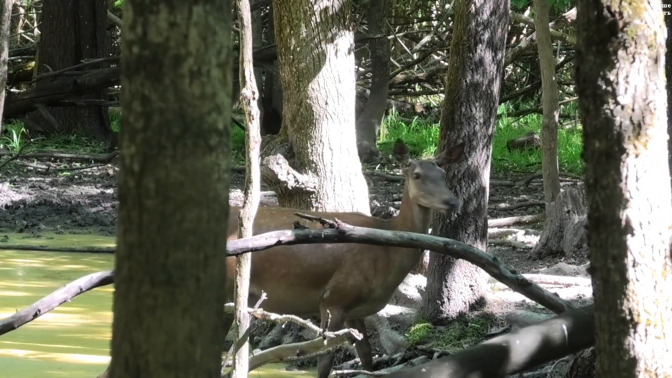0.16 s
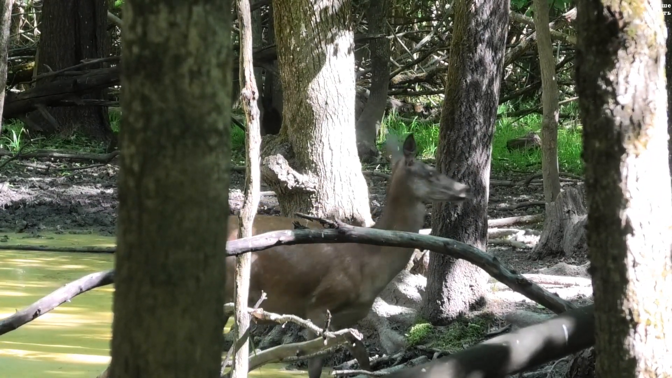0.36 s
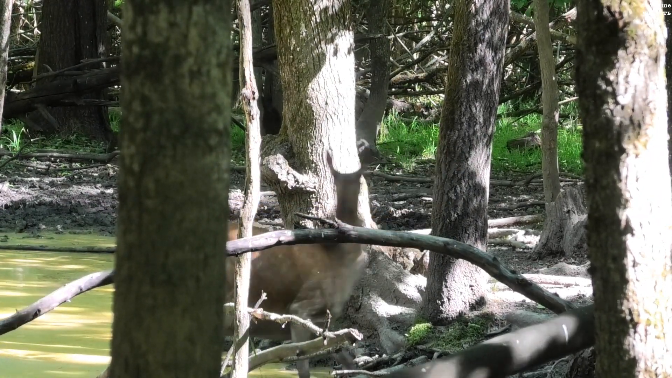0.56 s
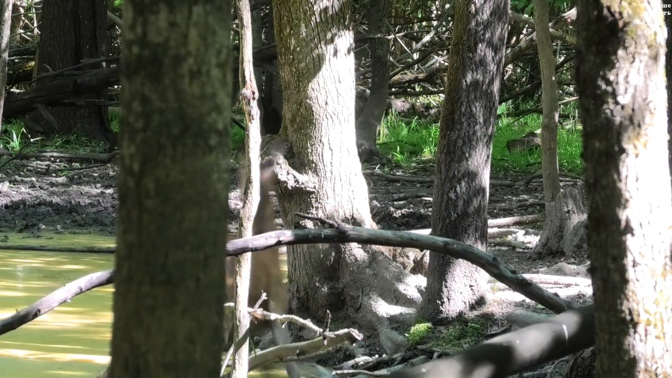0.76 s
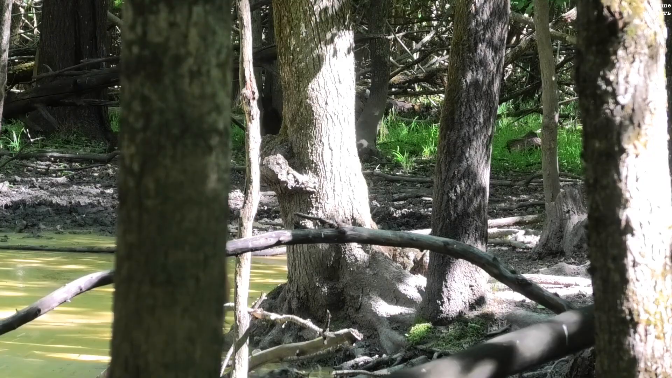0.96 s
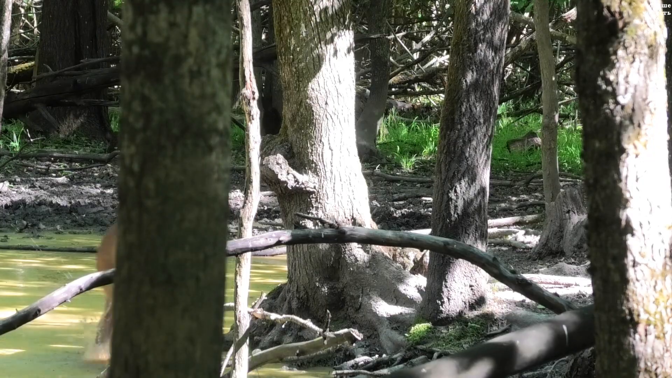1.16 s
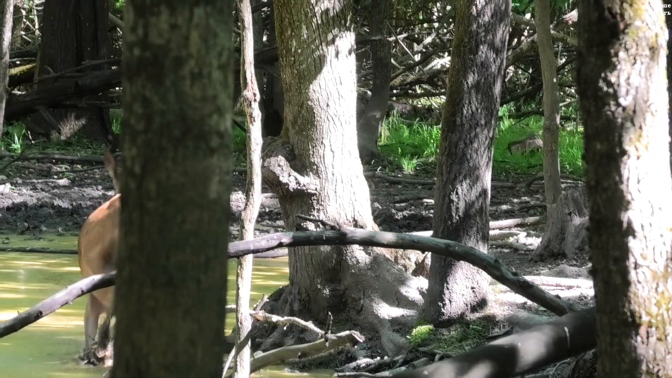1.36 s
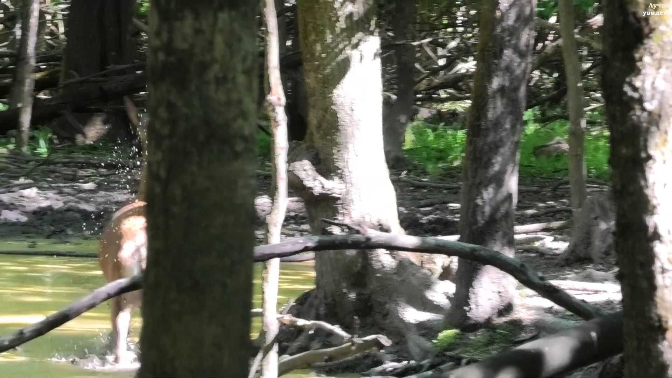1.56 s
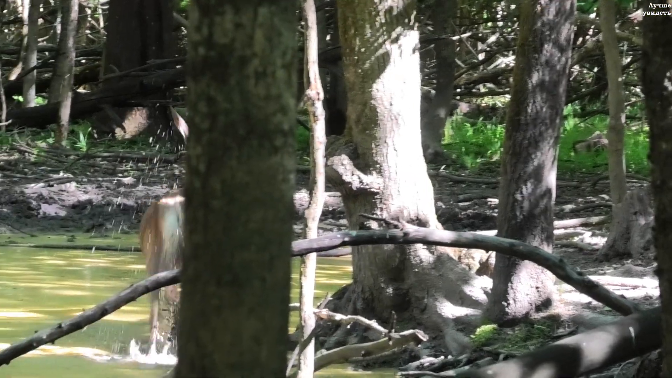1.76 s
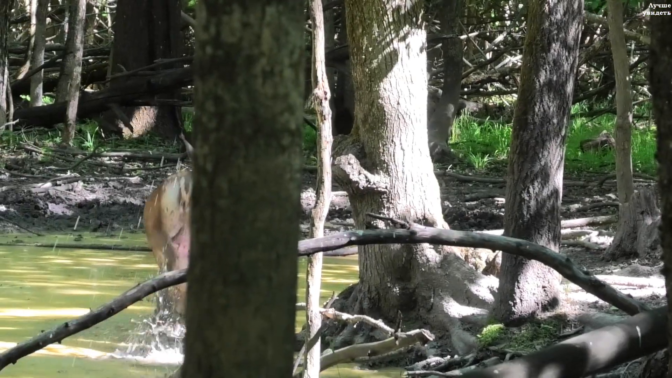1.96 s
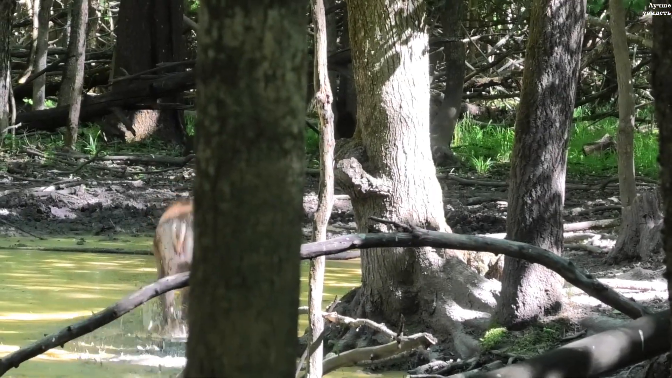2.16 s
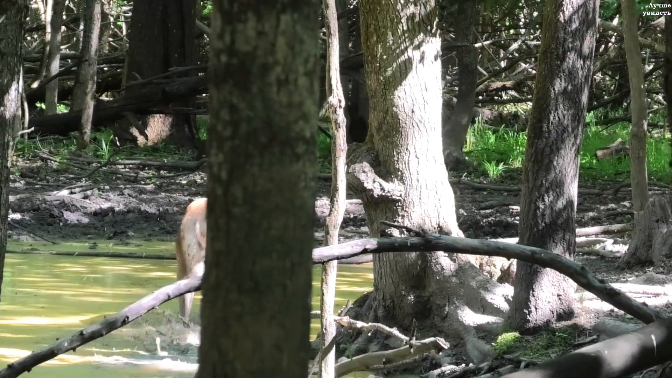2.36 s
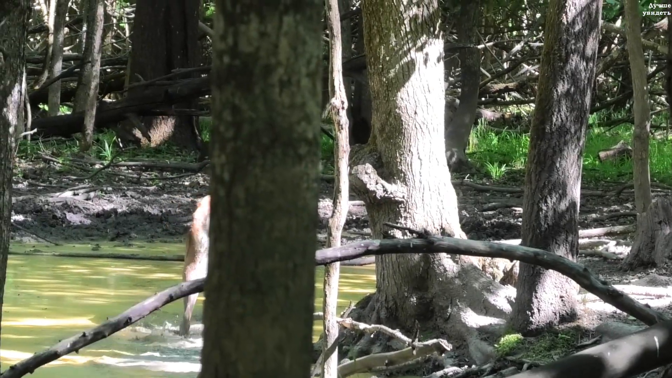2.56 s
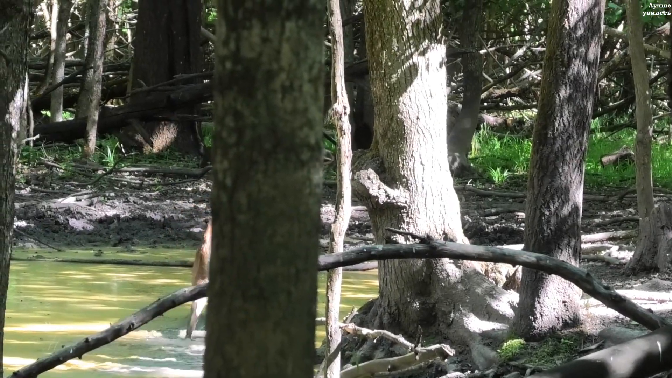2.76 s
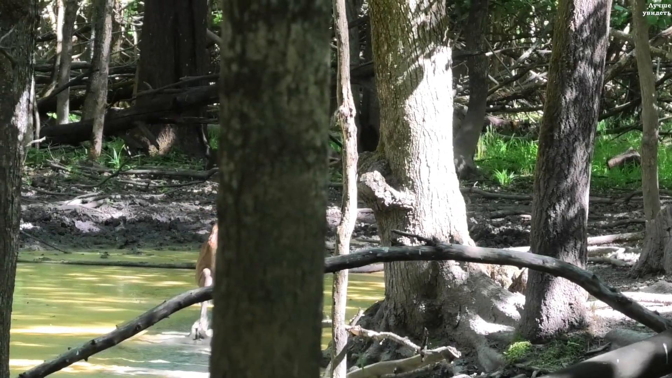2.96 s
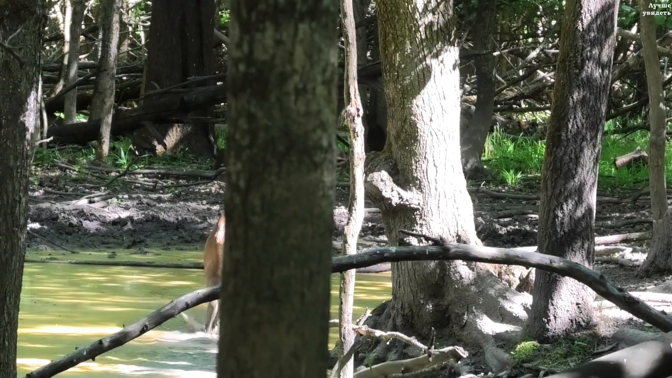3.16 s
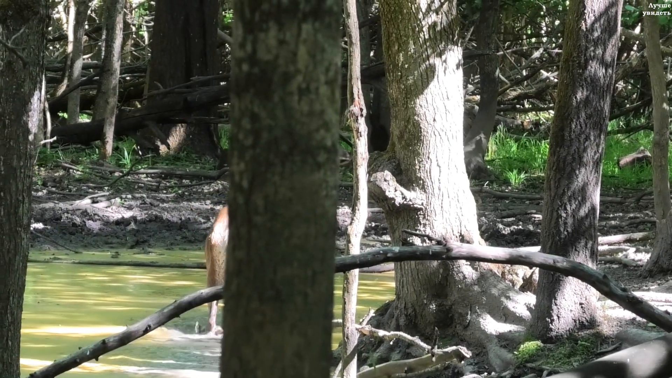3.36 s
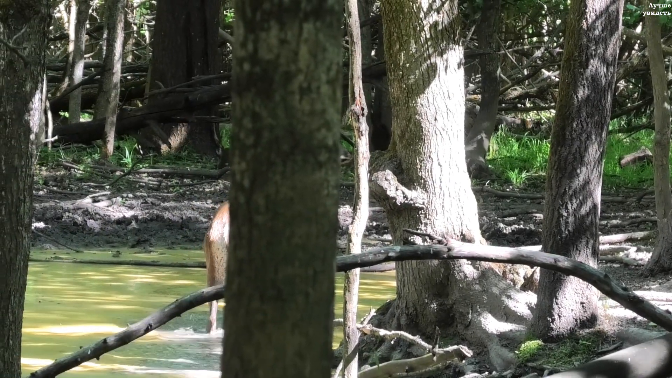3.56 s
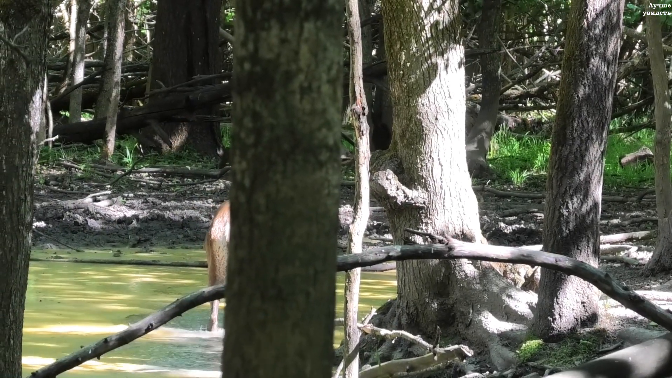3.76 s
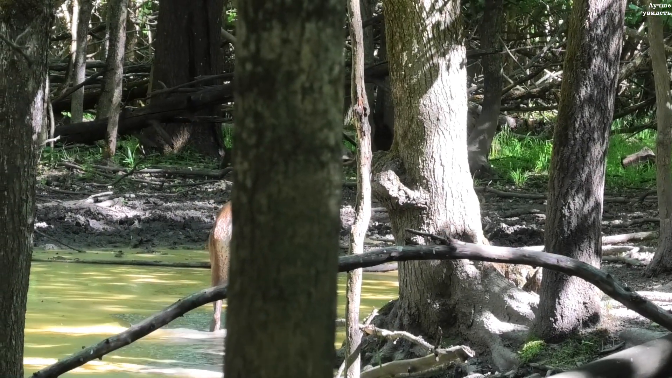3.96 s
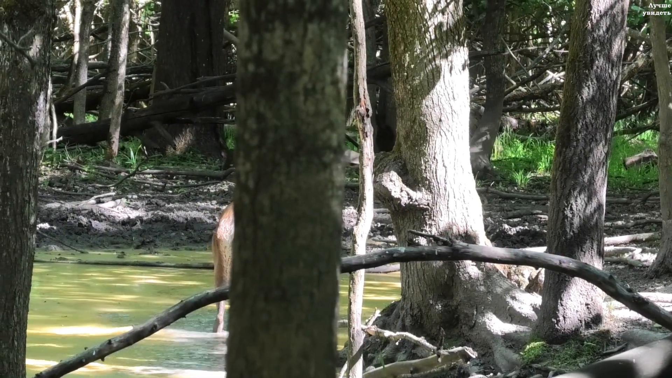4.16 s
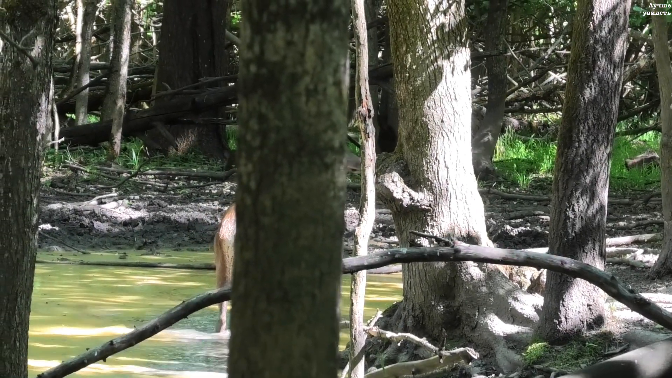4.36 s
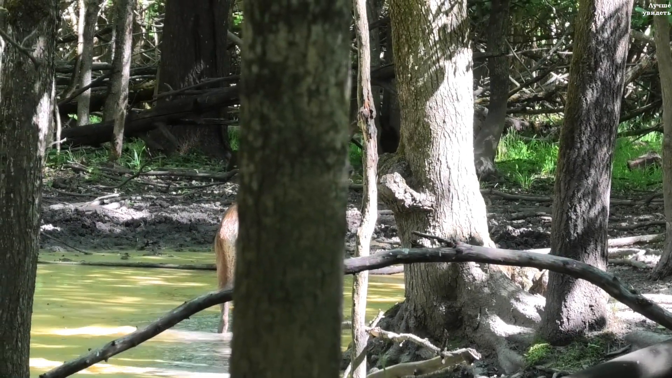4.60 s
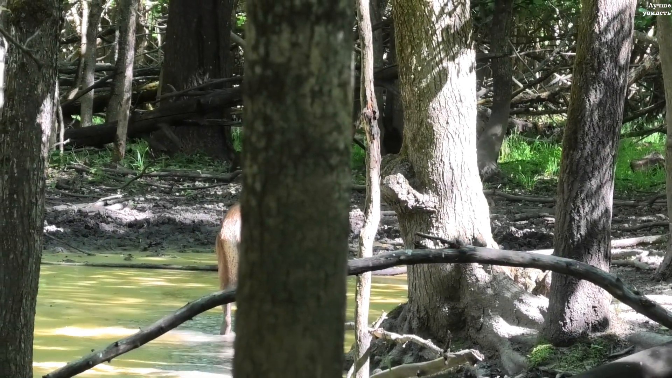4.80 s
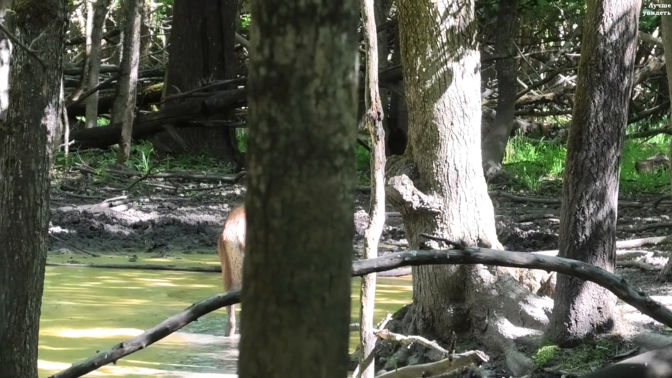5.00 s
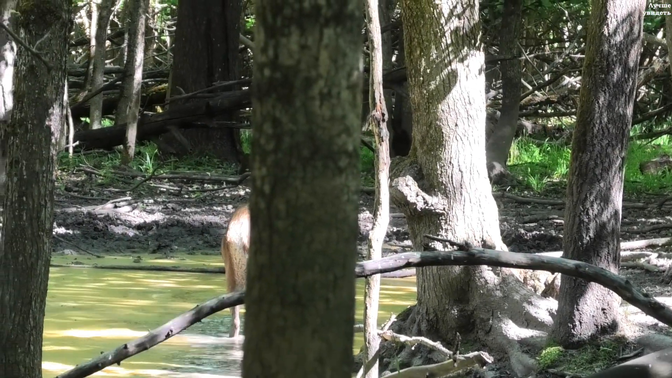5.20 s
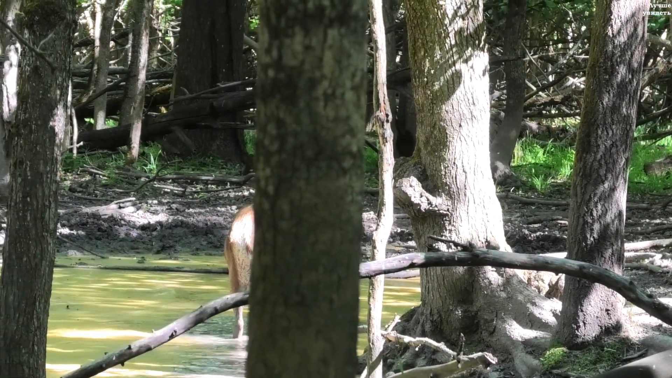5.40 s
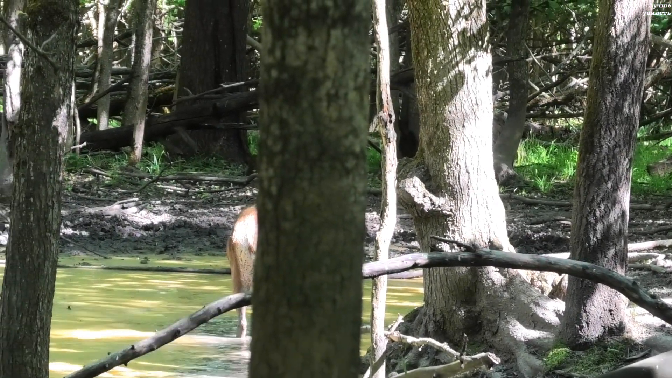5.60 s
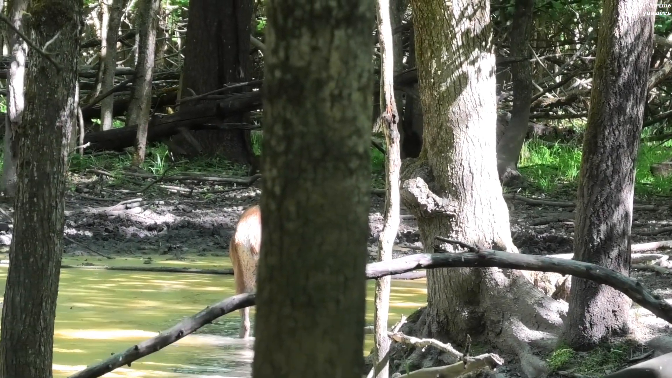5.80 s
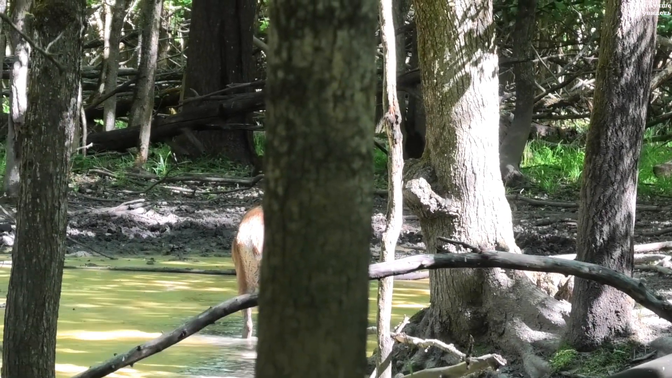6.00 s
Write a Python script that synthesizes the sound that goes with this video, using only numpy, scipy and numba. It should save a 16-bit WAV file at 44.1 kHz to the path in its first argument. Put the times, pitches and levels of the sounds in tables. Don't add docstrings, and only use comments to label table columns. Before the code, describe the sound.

A smooth, steady hiss of leaves and air fills a quiet wood throughout. From 0 to 0.7 seconds, water stirs softly as a deer starts to turn in a shallow pool. Drips and a splash arrive at 0.7-0.9, then sharper hoof splashes at about 1.1 and 1.3. The strongest run falls between 1.45 and 2.1: wet slaps, clear hollow plops, crackling bubbles and bright spray, with barely felt dull hoof knocks. Another lighter splash comes near 2.45, followed by scattered drips and slaps until 2.7. Small splashes at 2.9, 3.1 and 3.3 fade toward near calm. A modest plop and splash breaks it at 4.1. Afterwards only faint water movements remain to 6 seconds, with a thin, high insect buzz swelling around 4.8, 5.4 and 5.9. The microphone is somewhat distant and light in bass; trees add a brief, faint echo.

```python
import sys
import numpy as np
from scipy import signal
from scipy.fft import rfft, irfft, next_fast_len
from scipy.io import wavfile
from scipy.ndimage import uniform_filter1d
from numba import njit

SR = 44100
rng = np.random.default_rng(int(sys.argv[2]) if len(sys.argv) > 2 else 0)


def generate_wav(sig):
    pcm = np.round(np.clip(np.atleast_2d(sig).T, -1, 1) * 32767).astype(np.int16)
    wavfile.write(sys.argv[1], SR, pcm)


def rack_gain(trim_db):
    fader = np.asarray(trim_db, float)
    return 10 ** (fader / 20)


N = 266364
T = np.arange(N) / SR


def evened(x):
    return x / np.sqrt(np.mean(x ** 2) + 1e-20)


def read(points, hz):
    f, value = np.transpose(points)
    return np.interp(np.log(hz + 1), np.log(f + 1), value)


def coloured(x, points):
    size = next_fast_len(N)
    gain = rack_gain(read(points, np.fft.rfftfreq(size, 1 / SR)))
    return irfft(rfft(x, size) * gain, size)[..., :N]


def add(mix, s, sound):
    part = mix[..., max(round(s * SR), 0):][..., :sound.shape[-1]]
    part += sound[..., :part.shape[-1]]


def bubble(hz, ring_s, glide, phase):
    u = np.arange(round(7 * ring_s * SR) + 8) / SR / ring_s
    turns = np.cumsum(hz * (1 + glide * (u - 1))) / SR
    return u * np.exp(1 - u) * np.sin(2 * np.pi * (turns + phase))


def bursts(power, rows):
    out = power.copy()
    for at, db, rise_ms, fall_ms in rows:
        late_ms = (T - at) * 1000
        out += rack_gain(2 * db) * np.exp(-2 * abs(late_ms) / np.where(late_ms < 0, rise_ms, fall_ms))
    return out


# (frequency [Hz], density [dB/Hz])
WOOD_SPECTRUM = [(18, -92), (30, -62), (75, -48), (251, -20.5), (435, -12), (551, -6.5), (860, -3),
                 (1610, 4.5), (3640, 1), (4610, -2), (9860, -8), (14600, -15.5), (15800, -14)]
# (frequency [Hz], side minus mid [dB])
WOOD_WIDTH = [(60, -12), (130, -14), (290, -13.5), (640, -6), (1410, -7.5), (3100, -2.5), (6820, -17),
              (15000, 1.5)]
WOOD_DB = -35.5


def wood():
    frames, hz = N // 256 + 5, np.fft.rfftfreq(1024, 1 / SR)
    a, b, c, d, patches = rng.standard_normal((frames, 513, 5)).T
    patches = uniform_filter1d(patches, 14, 0)
    patches = evened(uniform_filter1d(patches, 16, 1))
    width = rack_gain(read(WOOD_WIDTH, hz))[:, None]
    z = np.array([a + 1j * b, width * (c + 1j * d)])
    z *= rack_gain(read(WOOD_SPECTRUM, hz)[:, None] + 1.44 * patches)
    hiss = signal.istft(z, nperseg=1024, noverlap=768)[1][:, :N]
    return rack_gain(WOOD_DB - 3.5) * hiss / np.sqrt(np.mean(hiss[0] ** 2))


# (time [s], level [dB])
CHORUS_LEVEL = [(3.4, -62), (3.9, -58), (4.3, -56), (4.45, -52), (4.63, -56), (4.8, -41.5), (4.97, -53),
                (5.14, -63), (5.25, -61), (5.4, -48), (5.55, -63), (5.9, -49), (6.04, -65)]
CHORUS_HZ, CHORUS_WIDTH_HZ = 3500, 300


def chorus():
    edges_hz = CHORUS_HZ + CHORUS_WIDTH_HZ * np.array([-3, -1, 1, 3])
    band = coloured(rng.standard_normal((2, N)), np.c_[edges_hz, [-80, 0, 0, -80]])
    level_db = np.interp(T, *np.transpose(CHORUS_LEVEL))
    return evened(band) * rack_gain(level_db + np.array([[0], [-4]]))


# (frequency [Hz], t60 [s])
TREE_DECAY = [(300, 0.25), (2000, 0.75), (6000, 0.67), (15000, 0.27)]


def trees(x):
    taps = np.zeros((2, SR // 2))
    at = np.arange(300, SR // 2 - 20, 20)
    at = at + rng.integers(0, 20, (2, (SR // 2 - 301) // 20))
    np.put_along_axis(taps, at, rng.choice([-1., 1.], at.shape), 1)
    hz, t, z = signal.stft(taps, SR, nperseg=256)
    fade = rack_gain(-60 * t / read(TREE_DECAY, hz)[:, None])
    tail = signal.istft(z * fade, SR, nperseg=256)[1]
    wet = signal.fftconvolve(x[None], tail / np.linalg.norm(tail[0]), axes=1)[:, :N]
    return np.array([wet[0], rack_gain(-3) * coloured(wet[1], WATER_WIDTH)])


# (time [s], level [dB])
THUDS = [
    (1.094, -71),
    (1.627, -73),
    (1.917, -82),
    (4.134, -72),
]


def thuds():
    out = np.zeros(N)
    for s, db in THUDS:
        add(out, s - .01, rack_gain(db) * bubble(50, .007, 0, .25))
    return out


# (time [s], peak [dB])
FLICKS = [(0.8694, -23), (1.096, -12), (1.3886, -19), (1.4496, -21), (1.4714, -17), (1.5, -21),
          (1.765, -23), (1.8707, -24), (1.918, -16), (1.9344, -30), (1.9594, -20), (2.0787, -15.5),
          (2.1294, -23), (2.4684, -32), (2.4994, -24)]
FLICK_MS = 3.5


def flicks():
    level, after_ms = np.zeros(N), np.arange(0, 40, 1000 / SR)
    for s, db in FLICKS:
        add(level, s, rack_gain(db - 3) * np.exp(-after_ms / FLICK_MS))
    hiss = coloured(rng.standard_normal((2, N)), [(2500, -30), (6000, 5), (11000, 5.5), (16000, -3)])
    return level * evened(hiss) * rack_gain([[0], [-9]])


# (time [s], peak [dB], pitch [Hz], length [ms])
PLOPS = [(1.0957, -13, 2400, 3.7), (1.0971, -13.5, 3210, 7.4), (1.108, -16, 2480, 3.7),
         (1.26, -20, 2565, 16.1), (1.287, -13.5, 3140, 3.8), (1.3243, -19, 3670, 11.5),
         (1.475, -6, 2400, 5.5), (1.4752, -20, 3100, 7.7), (1.4765, -17, 1620, 14.7),
         (1.5097, -15, 2370, 4.7), (1.624, -12, 1134, 8.2), (1.6305, -6, 4300, 2.23),
         (1.6296, -1, 2780, 2.1), (1.63, -8, 3790, 2.9), (1.632, -17, 1263, 13), (1.6373, -8, 2510, 3),
         (1.8829, -22, 1320, 8.4), (1.891, -17, 1820, 4.7), (1.8937, -13, 2480, 6.6),
         (1.92, -11, 2510, 7.4), (2.0894, -20, 1150, 4.3), (2.1005, -16, 1226, 7.5),
         (2.105, -19, 2455, 9.5), (2.1192, -21, 1175, 6.3), (2.1268, -23.5, 573, 7.4),
         (2.138, -29, 543, 12), (2.1395, -16.5, 1200, 8.5), (2.461, -17, 2630, 10.7),
         (2.4643, -19, 1770, 6.6), (4.1244, -27, 3670, 5.4)]
# (time [s], peak [dB], pitch [Hz])
DRIPS = [(.7394, -20, 2120), (0.7855, -26, 1170), (.862, -24.5, 1560), (1.123, -19, 2830),
         (1.503, -19, 5900), (1.6996, -19, 1080), (1.97, -13.5, 2300), (2.033, -26, 2570),
         (1.7767, -23, 1150), (2.2026, -22, 1670), (2.3336, -18, 2340), (2.3414, -27, 1120),
         (2.425, -26, 2430), (2.494, -21, 1770), (2.545, -25, 2380), (2.611, -22, 2420), (2.635, -24, 2400),
         (2.6555, -25, 1710), (3.3195, -23, 1640), (3.322, -32, 2500), (3.4888, -31, 1570),
         (4.0076, -30, 1440), (4.0562, -27, 1430), (4.123, -29, 1440), (4.1317, -32, 3620),
         (4.15, -29, 1900), (4.182, -29, 2000)]
# (time [s], peak [dB], pitch [Hz], ring [ms], left-right [dB])
SLAPS = [(1.0144, -13.5, 2170, 0.41, -1.5), (1.0944, -19, 3000, 0.25, -.5), (1.3534, -10, 3160, 0.32, -1.5),
         (1.472, -6.5, 2600, 0.24, -2), (1.477, -9, 2900, .3, -1), (1.6238, -9, 3080, 0.27, 4),
         (1.6287, -8, 3270, 0.23, -1.5), (1.9187, -3, 2820, 0.23, 0), (1.9197, -8, 3000, 0.24, -1),
         (1.922, -5.5, 3800, 0.54, -1), (2.0789, -13, 3300, .25, 0), (2.0885, -3, 2540, 0.35, 1),
         (2.3623, -15, 2400, 0.53, -2.5), (2.4146, -14, 2320, 0.62, 2), (2.585, -15, 1700, .4, -1.5),
         (2.685, -14, 2350, 0.4, -.5), (3.098, -15, 3210, 0.5, -1.5), (3.305, -27, 1600, 0.36, -1.5),
         (4.142, -8.5, 1880, 0.46, -27)]
DRIP_MS, PLOP_LEAN_DB, PLOP_SCATTER_DB = 6.61, 1, 4.0


def plops():
    out = np.zeros((2, N))
    drops = PLOPS + [(*row, DRIP_MS) for row in DRIPS]
    pans = PLOP_LEAN_DB + PLOP_SCATTER_DB * (rng.random(len(drops)) - .5)
    rows = [(s - ms / 2000, db, hz, ms / 2.6, pan) for (s, db, hz, ms), pan in zip(drops, pans)]
    rows += SLAPS
    for (s, db, hz, ring_ms, pan_db), glide in zip(rows, rng.random(len(rows))):
        side = np.tanh(pan_db * np.log(10) / 40)
        ring = rack_gain(db - 3.5) * bubble(hz, ring_ms / 1000, 0.022 * glide, 0)
        add(out, s, np.outer([1, side], ring))
    return out


# (time [s], level [dB])
WADING = [(0, -35), (.66, -33.5), (1.0, -36.5), (1.15, -32), (1.41, -29.5), (1.56, -25.5), (1.84, -27.5),
          (2.04, -29), (2.4, -28), (2.69, -31), (2.73, -33), (2.85, -38), (3.2, -33), (3.4, -35.5),
          (3.56, -41), (3.9, -45.5), (4.3, -51), (6.04, -48)]
# (time [s], peak [dB], build-up [ms], fall [ms])
STRIDES = [(.03, -35.5, 40, 45), (.74, -29, 40, 48), (.92, -26.5, 150, 134), (1.092, -20.5, 18, 56),
           (1.28, -22.5, 156, 96), (1.471, -16.5, 27, 35), (1.63, -19.5, 37, 31), (1.67, -26, 30, 270),
           (1.9, -23, 27, 280), (2.09, -19.5, 25, 38), (2.466, -24.5, 42, 47), (2.582, -32, 25, 120),
           (2.882, -34, 39, 58), (3.098, -32.5, 26, 37), (3.32, -38, 40, 42), (3.616, -43, 40, 100),
           (3.834, -43, 40, 80), (4.05, -38, 160, 15), (4.139, -27, 44, 64), (4.444, -39, 85, 53),
           (4.73, -44, 200, 50), (4.832, -38.5, 81, 67), (5.074, -37, 63, 120), (5.336, -39.5, 110, 34),
           (5.394, -38.5, 26, 30), (5.744, -37.5, 87, 28), (5.908, -36.5, 55, 55)]
# (time [s], peak [dB], relative spray [dB], relative slosh [dB])
SPLASHES = [(0.9014, -6, -8, -28), (1.2844, -10, -9, -1), (1.4716, -9, -16, -26), (1.5094, -1, -7, -23),
            (1.6277, 3.5, -24, -23), (1.6644, 0, -19, -21), (1.8652, 1.5, -14, -12),
            (1.8796, 1.5, -5, -6.5), (1.917, -9, 9, -30), (1.9694, -4, 0, -6), (2.0882, -12, -16, -24),
            (2.1959, -6, -5, -15), (2.4588, -7, -6, -24), (2.8894, -10, -16, -27), (3.3189, -9.5, -7, -25),
            (4.1, -6.5, -5, -11), (4.118, -6, -5, -9), (4.8294, -15, -16, -17), (5.0644, -27, -14, -15),
            (5.9144, -17.5, -14, -1)]
SPLASH_RISE_MS, SPLASH_FALL_MS = 5.3, 21
SPRAY_DB, SPRAY_LEAD_S = -6.5, 0.0031
SLOSH_DB, SLOSH_FOLLOWS = -42, 0.83


def stirring():
    churn = bursts(rack_gain(2 * np.interp(T, *np.transpose(WADING))), STRIDES)
    churn_db = 10 * np.log10(churn) - 1.5
    spray_db = np.interp(T + SPRAY_LEAD_S, T, churn_db) + SPRAY_DB
    slosh_db = SLOSH_DB + SLOSH_FOLLOWS * (churn_db + 30)
    power = rack_gain(2 * np.array([churn_db, spray_db, slosh_db]))
    hooves = [(s + 0.0028, db - 23 + np.array([[0], [spray], [slosh]]), SPLASH_RISE_MS, SPLASH_FALL_MS)
              for s, db, spray, slosh in SPLASHES]
    return np.sqrt(bursts(power, hooves))


@njit
def ring_all(n, at, size, place, decay, turn, glide):
    out = np.zeros((2, n))
    for k in range(len(at)):
        z, step = size[k], decay[k] * turn[k]
        for i in range(min(int(-6 / np.log(decay[k])), n - at[k])):
            out[0, at[k] + i] += i * z.real
            out[1, at[k] + i] += i * z.real * place[k]
            z *= step
            step *= glide[k]
    return out


# (frequency [Hz], density [dB/Hz])
WATER_SPECTRUM = [(59, -79), (100, -26), (533, -19), (886, -7), (1190, -5.5), (1440, -5), (1670, -3.5),
                  (1980, -5), (2400, -2.5), (5140, -9), (6920, -8.5), (11500, -13.5), (15800, -28)]


def swarm(level, lo_hz, hi_hz, cycles, spread_db, rise, count):
    when, pitch, vary, phase, luck = rng.random((count, 5)).T
    at = (when * N).astype(np.int64)
    hz = lo_hz * (hi_hz / lo_hz) ** pitch
    ring = cycles * (.5 + vary) / hz * SR
    loud_db = read(WATER_SPECTRUM, hz) - spread_db * np.log(luck + 0.029)
    power = rack_gain(2 * loud_db) * hz
    power *= N / count / power.mean()
    size = level[at] * np.sqrt(8 * power / ring ** 3) * np.exp(2j * np.pi * phase)
    turn = 2 * np.pi * hz / SR
    glide = np.exp(1j * turn * rise * vary / ring)
    place = rng.standard_normal(count)
    return ring_all(N, at, size, place, np.exp(-1 / ring), np.exp(1j * turn), glide)


# (frequency [Hz], gain [dB])
MIRROR = [(300, -10.5), (1200, -13.5), (3000, -44), (5000, -42), (9000, -25)]
MIRROR_HZ = 592
# (frequency [Hz], side minus mid [dB])
WATER_WIDTH = [(60, -17), (130, -16), (290, -29), (640, -6.5), (1410, -7), (3100, -6), (6820, -16.5),
               (15000, -7)]


def water():
    churn, spray, slosh = stirring()
    mix = swarm(churn, 1227, 5126, 1.55, 1.35, 0.059, count=40000)
    mix += swarm(spray * rack_gain(1.0), 5210, 16300, 1.53, 0.54, 0.013, count=100000)
    mix += swarm(slosh, 177.7, 1196, 1.9, 1.64, 0.071, count=10000)
    mix += np.roll(coloured(mix, MIRROR), round(SR / MIRROR_HZ), axis=1)
    return np.array([mix[0], coloured(mix[1], WATER_WIDTH)])


# (frequency [Hz], gain [dB])
SMALLNESS = [(30, -40), (100, -24), (160, -13), (300, 0)]
# (frequency [Hz], left-right [dB])
LEAN = [(60, -2), (180, 0), (550, -0.5), (1650, -1.5), (4970, -1), (15000, 1)]
WOOD_LEAN_DB = -1


def scene():
    near = coloured(water() + plops() + flicks(), SMALLNESS)
    mid, side = near + rack_gain(-13.5) * trees(near[0])
    far_mid, far_side = wood() + chorus()
    left = mid + side + (far_mid + far_side) * rack_gain(WOOD_LEAN_DB / 2)
    right = mid - side + (far_mid - far_side) * rack_gain(-WOOD_LEAN_DB / 2)
    f, lean_db = np.transpose(LEAN)
    left = coloured(left, np.c_[f, lean_db / 2])
    right = coloured(right, np.c_[f, -lean_db / 2])
    return np.array([left, right]) + thuds()


def top_cut(x):
    return signal.sosfilt(signal.butter(12, 16460, fs=SR, output="sos"), x)


# (frequency [Hz], gain [dB])
MICROPHONE = [(5300, 0), (6800, 1.5), (8500, 0), (15780, 2), (15900, -60)]


def record(dry):
    overloaded = 1.643 * np.tanh(dry / 1.59)
    return top_cut(coloured(overloaded, MICROPHONE))


dry = scene()
out = record(dry)
generate_wav(out)
```